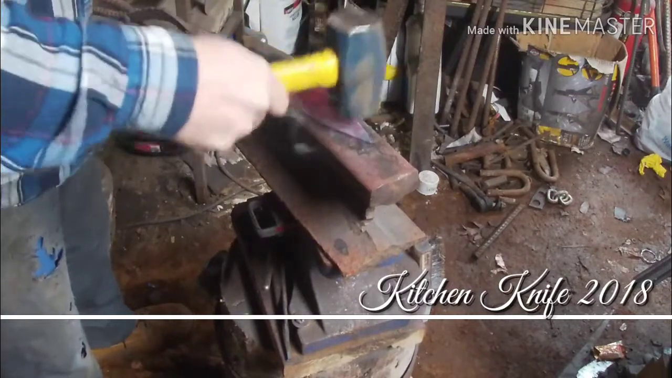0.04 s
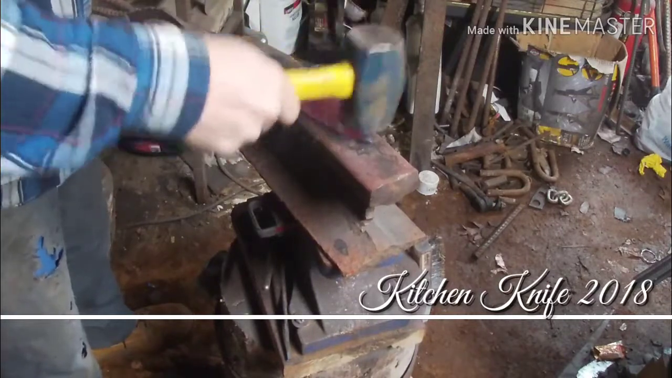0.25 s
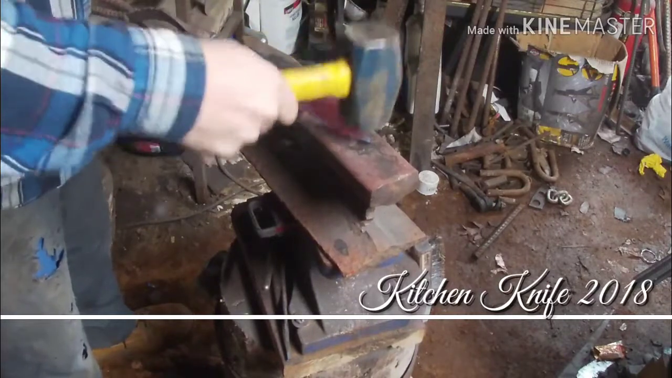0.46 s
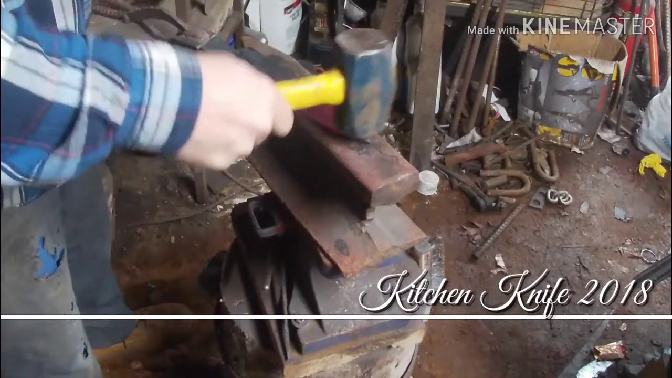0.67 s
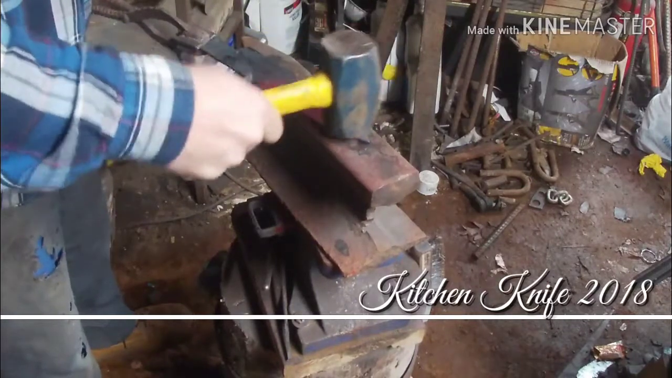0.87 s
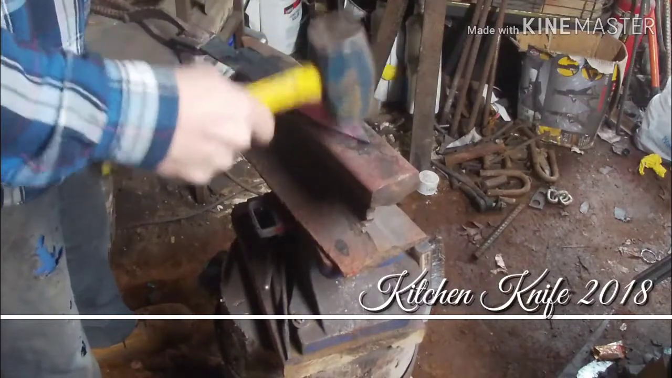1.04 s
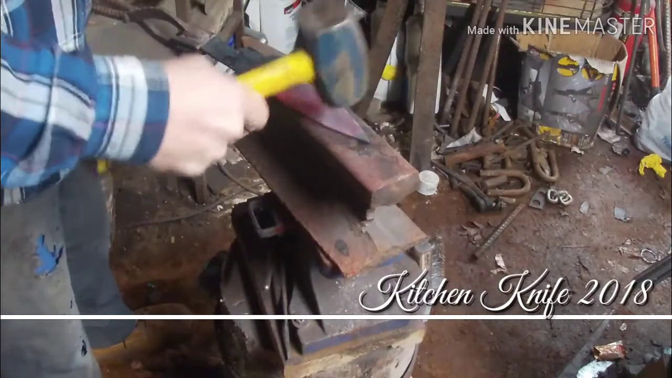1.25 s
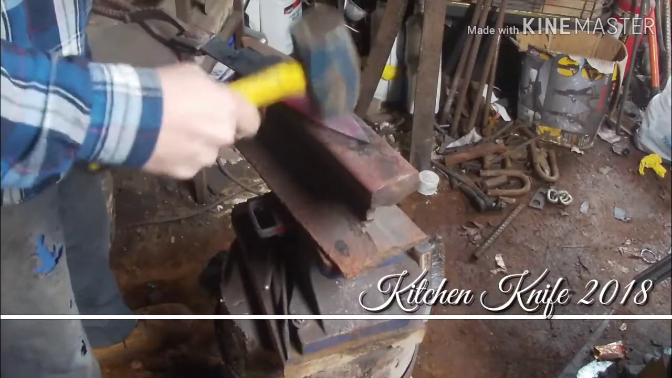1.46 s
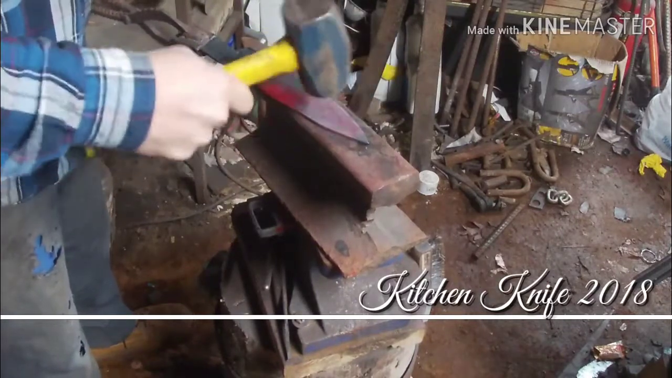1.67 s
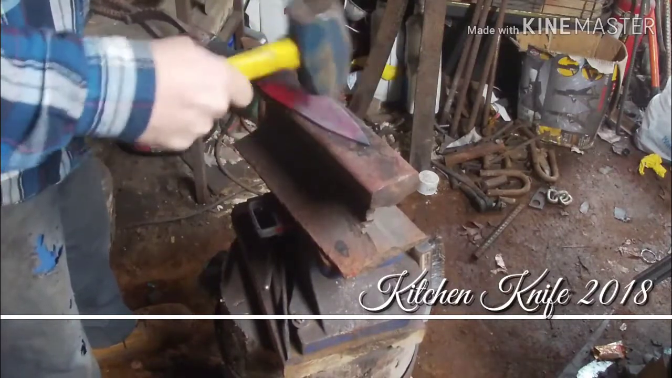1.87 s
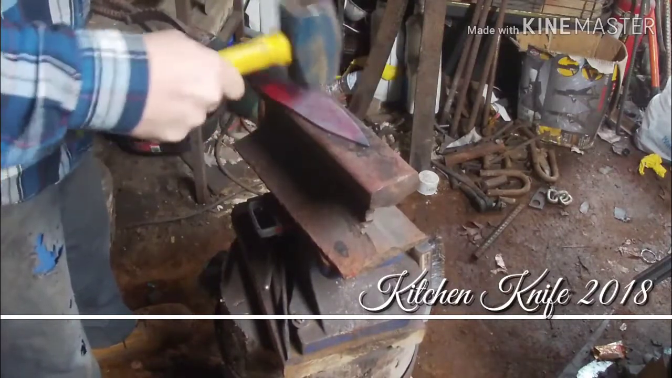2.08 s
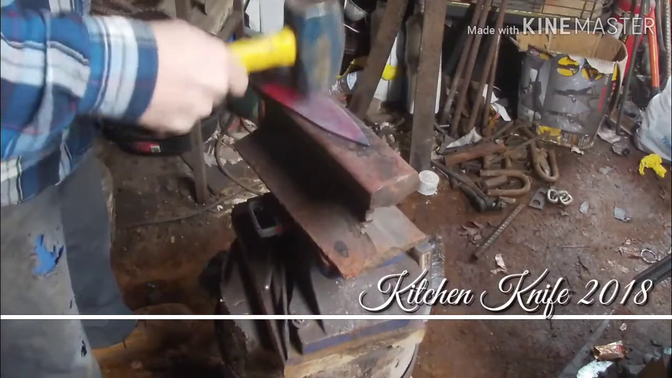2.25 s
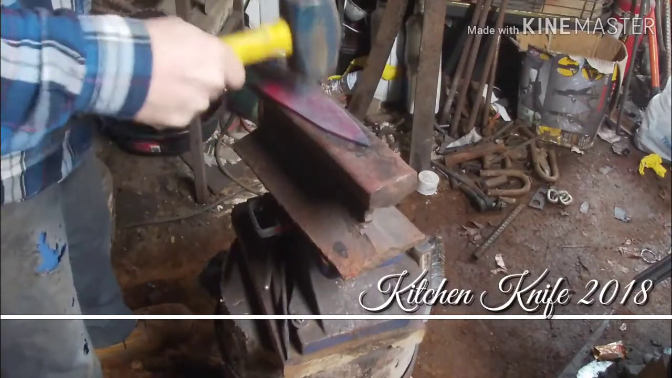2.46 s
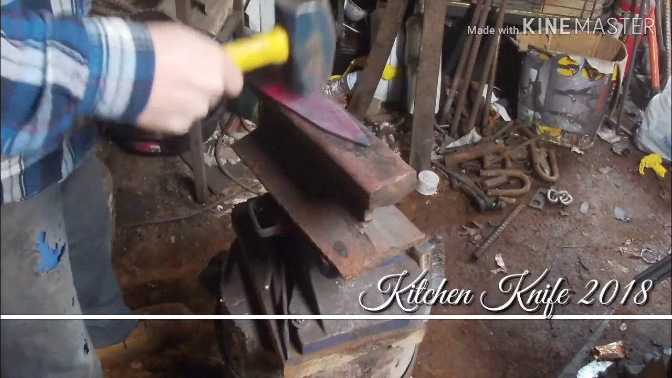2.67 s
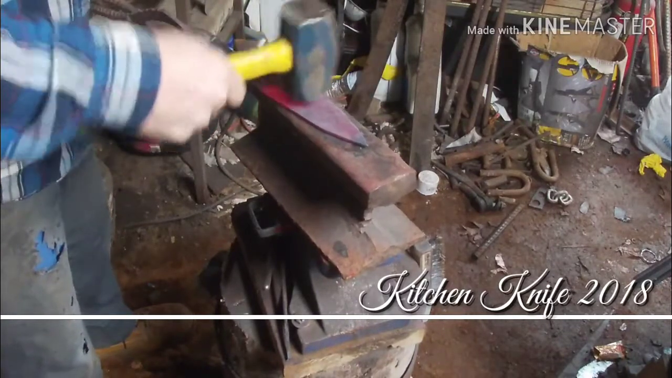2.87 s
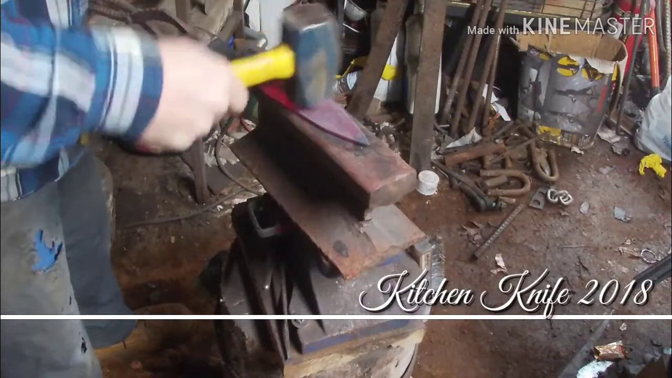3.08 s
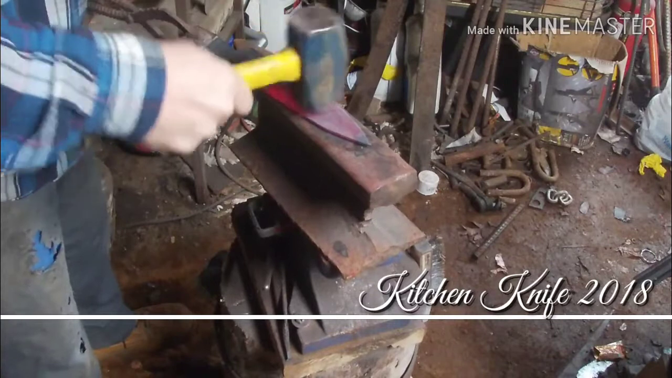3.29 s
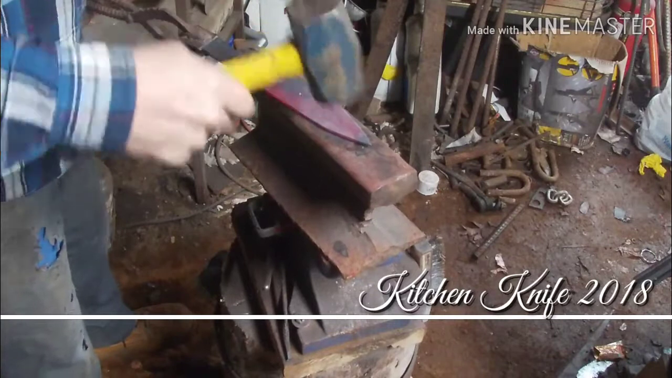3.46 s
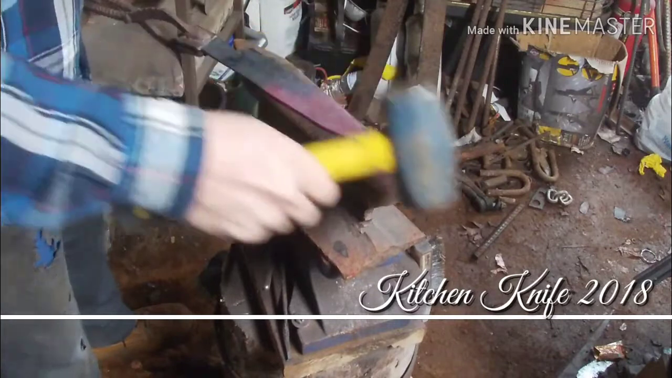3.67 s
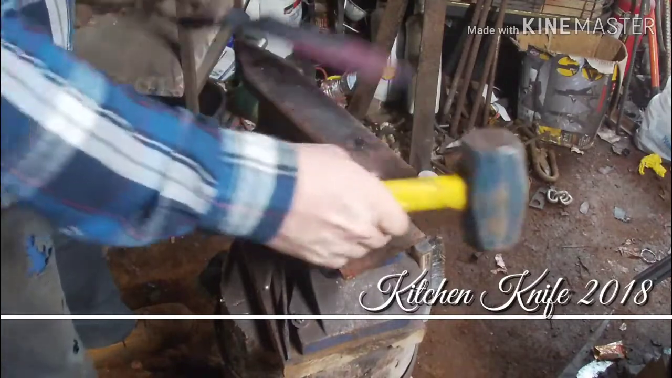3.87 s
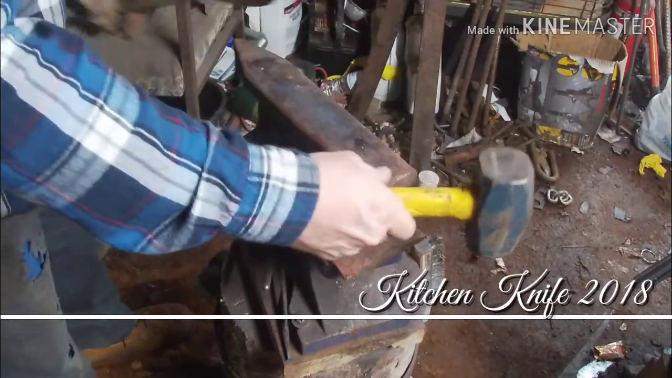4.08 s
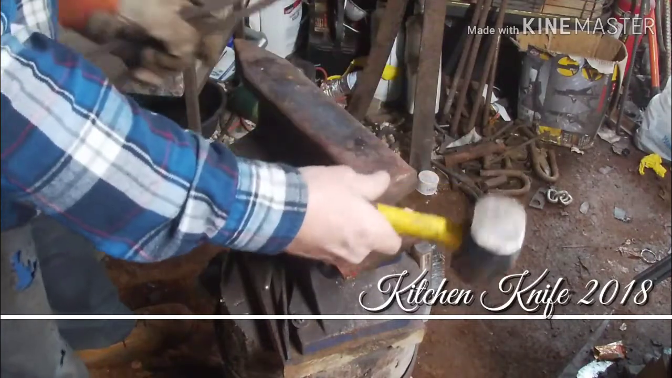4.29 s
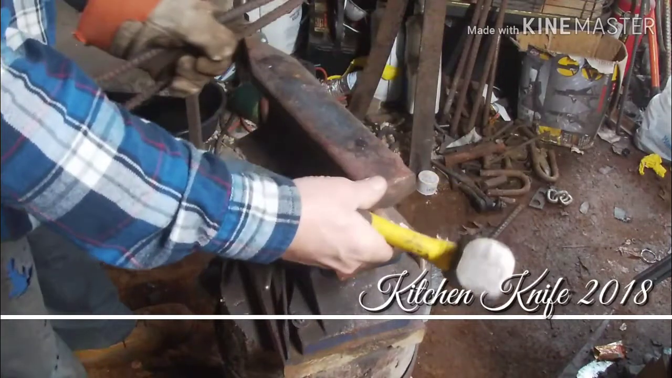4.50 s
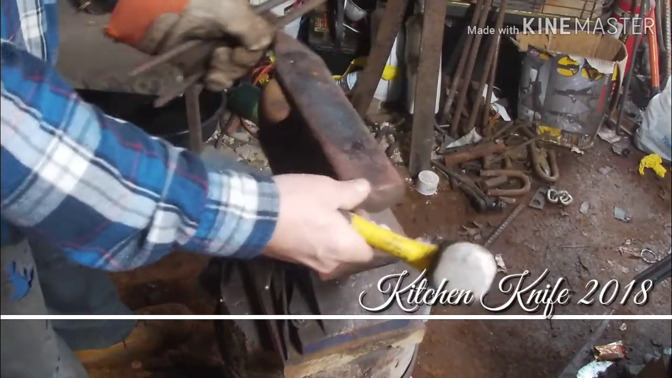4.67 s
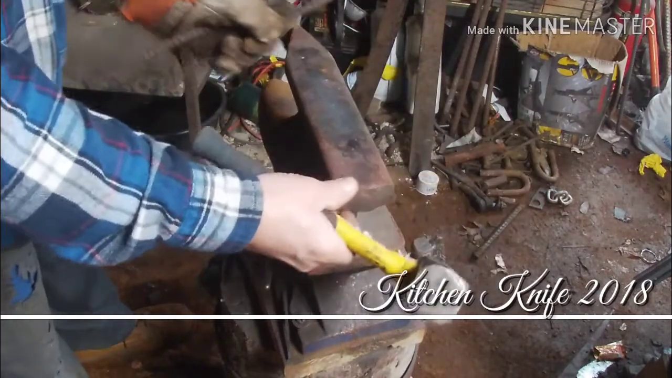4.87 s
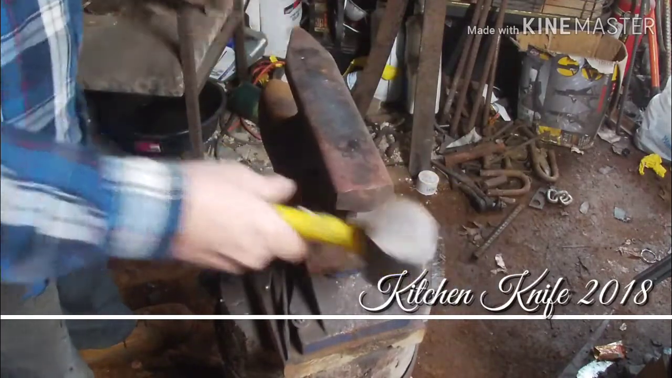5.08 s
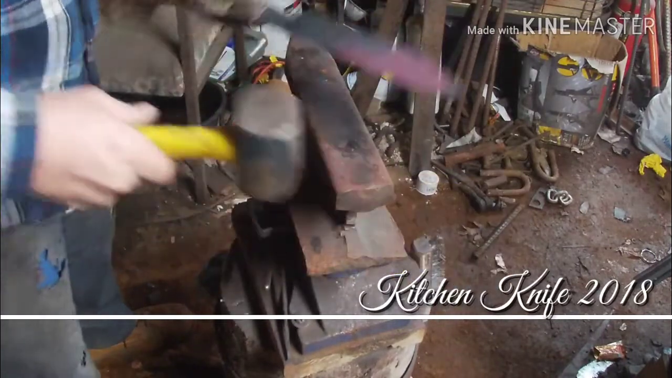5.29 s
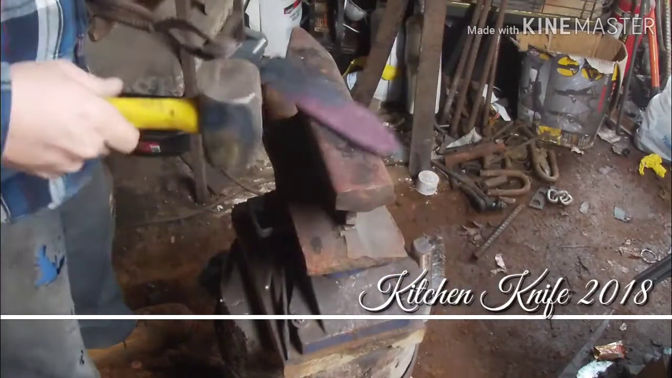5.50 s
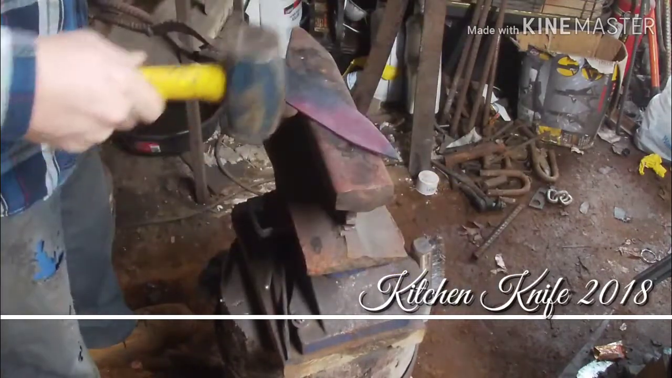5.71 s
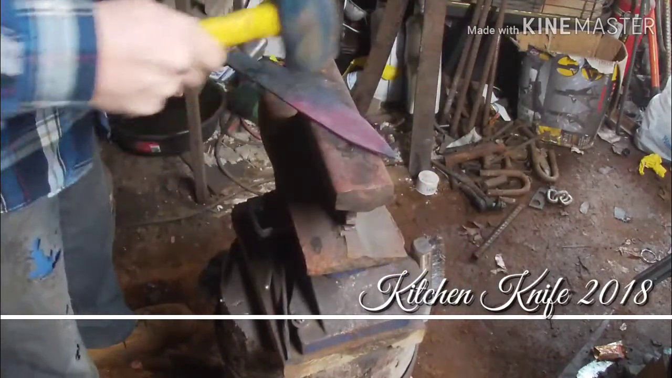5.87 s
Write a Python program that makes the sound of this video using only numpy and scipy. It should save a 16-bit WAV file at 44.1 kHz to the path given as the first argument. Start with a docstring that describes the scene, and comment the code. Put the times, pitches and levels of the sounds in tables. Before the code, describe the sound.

A hammer strikes hot steel about four or five times a second with dull clacks and short bright rings, then only rumbling forge draught remains.

```python
"""Hammer blows flatten a red-hot blade on a length of steel rail: each gives a crack, a dull clack and a ring.
The rings and clack are sums of decaying modes; the crack and the shed's echo are noise under decaying envelopes.
The blows are nearly evenly paced; in the pause after them the lifted blade shifts with faint scuffs of noise.
Behind it a forge rumbles (noise through narrow resonances) and hisses (noise that swells and flutters)."""
import sys
import numpy as np
from scipy import signal
from scipy.fft import rfft, irfft
from scipy.io import wavfile
from scipy.ndimage import uniform_filter1d

SR = 44100
rng = np.random.default_rng(int(sys.argv[2]) if len(sys.argv) > 2 else 0)


def master(y):
    """Save y as 16-bit WAV."""
    cut = np.clip(np.atleast_2d(y).T, -1, 1)
    pcm = np.round(cut * 32767)  # scale
    wavfile.write(sys.argv[1], SR, pcm.astype(np.int16))


N = 261954
TIME = np.arange(N) / SR

# Hammer blows; the spot struck decides how much each ring answers.
# Each row: start in seconds, knock level in dB, then low, main and high ring group levels in dB.
BLOWS = [(-0.15, -7.5, -29, -23, -32), (0.0683, -18, -33.5, -40.5, -48), (0.293, -15.5, -34, -27.5, -38),
         (0.518, -16, -30.5, -20.5, -32.5), (0.739, -16.5, -33.5, -19, -34), (0.9541, -17.5, -35, -17, -31),
         (1.174, -15.5, -32, -20.5, -29.5), (1.4027, -16.5, -32.5, -19, -27.5),
         (1.6135, -15.5, -30.5, -23.5, -36.5), (1.8422, -17.5, -20.5, -20, -29.5),
         (2.0534, -15.5, -22, -23, -32), (2.273, -22.5, -37, -41, -40), (2.493, -18, -22, -24, -26.5),
         (2.713, -19.5, -24, -31.5, -38), (2.929, -18, -20.5, -34.5, -35), (3.142, -19.5, -48, -32, -36.5),
         (3.3664, -21, -27.5, -32.5, -42)]
# Modes of the ringing steel, in groups that answer to where the blow lands.
# Each row: nominal frequency in Hz, level in dB relative to its group, free decay time t60 in seconds.
LOW_RING = [(2748, 2, 0.32), (2800, -10, 0.23)]
MAIN_RING = [(3596, 4, 0.55), (3650, -16, .3)]
HIGH_RING = [(4734, -1, .55), (4621, -8, .55)]
OVERTONES = [(3394, -2.5, .45), (4256, -5, .45), (5538, -8, .45), (5880, -12, .5), (6037, -10, .55),
             (6298, -8, .45), (6590, -15, .45), (6783, -11, .45), (6993, -13, .5), (7930, -22, .45),
             (8250, -21, .45), (9351, -19, .45), (9505, -23, .45), (9954, -25, .5), (11052, -36, .55),
             (12102, -30, .4), (13291, -36, .4)]
# A thin whistle that comes with the main ring and escapes the choke.
# Each row: frequency in Hz, level in dB relative to the main ring group, t60 in seconds.
WHISTLE = [(7682, -32, .85)]
# Hammer, blade and rail pressed together.
# Each row: mean frequency in Hz, relative level in dB ahead of the bass cut, t60 in seconds.
CLACK = [(790, -3, .028), (900, -6, .024), (1320, 0, .012), (1580, 2, .013), (1805, -3, .016),
         (2000, -5, .012), (2700, -3, .01)]
# The stump that carries the rail, and faint tones that linger in the rail.
# Each row: frequency in Hz, mean level in dB relative to the knock, t60 in seconds.
STUMP = [(149.4, 2.5, 0.085), (303, -9.5, 0.075)]
RAIL_HUM = [(1556, -17, .38), (1809, -22, .32)]
# Noise spectra of the crack, the shed's echo, the scuffs and the forge's draught.
# Each row: frequency in Hz, relative density in dB per Hz.
CRACK_SPECTRUM = [(500, -2.5), (900, 9.5), (2500, -4), (4200, 3.5), (5200, -2), (6300, -2), (7500, -2),
                  (9400, -5), (10600, -18), (12000, -15), (15000, -14)]
ECHO_SPECTRUM = [(400, -37), (820, 0), (1100, -6.5), (1560, 2), (1850, -2.5), (2250, -14.5), (2750, -2),
                 (3300, -10.5), (5200, -13.5), (6400, -3), (7600, -17), (9400, -19.5), (10600, -30),
                 (14800, -30.5)]
SCUFF_SPECTRUM = [(700, 3.5), (2000, -2), (4000, -12.5), (9000, -31), (13000, -63)]
DRAUGHT_SPECTRUM = [(300, -12.5), (450, 2.5), (560, -5), (700, -7), (850, 1), (980, -1), (1150, -7),
                    (1400, -15.5), (1900, -14), (3300, -18.5), (3900, -23.5), (5000, -27), (8500, -40.5),
                    (12000, -61)]
# The blade and tongs shift lightly in the pause. Each row: start in seconds, level in dB.
SHIFTS = [(4.053, -48), (4.765, -40.5), (5.564, -39.5), (5.632, -39.5), (5.715, -42)]
# Resonances of the forge's roar.
# Each row: frequency in Hz, approximate half-power width in Hz, relative power in dB.
ROAR = [(35, 12, -5.5), (64.9, 5.3, 1.5), (92.8, 11, 0), (133.5, 42, 1.5), (153.5, 15, -6),
        (205.3, 18.6, 1), (217, 41, -6), (248, 28, -4.5), (316, 38, -4), (347.4, 15, -16.5),
        (381.8, 18, -7.5), (385.3, 17.3, -6)]
# Swells of the draught. Each row: crest in seconds, half width (to 1/e of the rise) in seconds, rise in dB.
SWELLS = [(0.3, 1.96, 7.5), (4.25, 0.32, 3), (5.85, 0.38, 5)]

# a flat blow sets the whole rail ringing, a glancing one cracks instead:
# level on a typical blow in dB, then dB per dB of ring
TYPICAL_LOW_DB, TYPICAL_MAIN_DB = -30, -25
OVERTONE_DB, OVERTONES_PER_MAIN, OVERTONES_PER_LOW = -34.5, 0.43, 0.42
SNAP_DB, SNAP_PER_MAIN = -23, -0.22
# the tongs tighten over the first blows and ease off before the lift;
# full grip chokes the low and main rings and sharpens the low one
TIGHTEN_S, EASE_FROM_S, EASE_UNTIL_S = 0.46, 1.34, 2.97
CHOKE_DB_PER_S, SHARPEN_SHARE = 240, 0.0043
# the upper partials are choked alike under any grip; the overtones shift in pitch from blow to blow
UPPER_CHOKE_DB_PER_S, OVERTONE_DETUNE = 32.5, 0.0014
# the roar's level sinks a little during the hammering, then recovers
LOW_ROAR_DB, UPPER_ROAR_DB = -21.5, -22.0
SINK_FROM_S, SINK_S, RECOVER_FROM_S, RECOVER_S = 0.065, 1.05, 3.24, 0.37
LOW_SINK_DB, UPPER_SINK_DB = 3.5, 4
# the draught between swells: its rush and its bright hiss
RUSH_DB, HISS_DB = -43.5, -51
RUSH_FOLLOWS = 0.77  # share of the hiss's swell, in dB
CUTOFF_HZ = 15150


def hammering(crack_db=7.0, crack_t60=0.018, clack_db=-1.5,
              echo_db=-7.0, bright_echo_db=-8.0, echo_t60=0.26, bright_t60=0.33):
    """Impact excitation: contact noise, struck modes, and a wash of weak partials smeared by the shed."""
    steel, crack, echo, bright_echo = np.zeros((4, N))
    t = TIME[:SR * 3 // 5]
    build_up = 1 - np.exp(-t / 0.00054)
    for s, knock_db, low_db, main_db, high_db in BLOWS:
        snap_db = SNAP_DB + SNAP_PER_MAIN * (main_db - TYPICAL_MAIN_DB)
        grip = ramp(s, 0, TIGHTEN_S) - ramp(s, EASE_FROM_S, EASE_UNTIL_S - EASE_FROM_S)
        knock = from_db(clack_db) * clack(t) + support(t)
        crack_onset = 1 - np.exp(-t / 0.00014)
        add(steel, s, steel_ring(t, low_db, main_db, high_db, grip))
        add(steel, s, from_db(knock_db) * knock)
        add(crack, s, from_db(snap_db + crack_db) * fade(t, crack_t60) * crack_onset)
        add(echo, s, from_db(knock_db + echo_db) * fade(t, echo_t60) * build_up)
        add(bright_echo, s, from_db(snap_db + bright_echo_db) * fade(t, bright_t60) * build_up)
    dull = split(coloured_noise(ECHO_SPECTRUM, ripple_db=2), hz=3770)[0]
    bright = split(coloured_noise(ECHO_SPECTRUM, ripple_db=12), hz=4000)[1]
    crack_sound = crack * coloured_noise(CRACK_SPECTRUM, ripple_db=5)
    return steel + crack_sound + echo * dull + bright_echo * bright


def steel_ring(t, low_db, main_db, high_db, grip, free_s=0.11):
    """Contact damping: the steel rings freely while the hammer rebounds; the settling blade then chokes it."""
    overtone_db = (OVERTONE_DB + OVERTONES_PER_MAIN * (main_db - TYPICAL_MAIN_DB)
                   + OVERTONES_PER_LOW * (low_db - TYPICAL_LOW_DB))
    lower = from_db(low_db) * ring(LOW_RING, t, spread_db=0.5, scatter=0.55, sharpen=SHARPEN_SHARE * grip)
    lower += from_db(main_db) * ring(MAIN_RING, t, spread_db=0.3, scatter=0.15)
    upper = from_db(high_db) * ring(HIGH_RING, t, spread_db=0.8, scatter=0.5)
    upper += from_db(overtone_db) * ring(OVERTONES, t, spread_db=3, scatter=0.55, detune=OVERTONE_DETUNE)
    whistle = from_db(main_db) * ring(WHISTLE, t, spread_db=1, scatter=0.15)
    settled_s = np.maximum(t - free_s, 0)
    choked = lower * from_db(-CHOKE_DB_PER_S * grip * settled_s)
    choked += upper * from_db(-UPPER_CHOKE_DB_PER_S * settled_s)
    return (choked + whistle) * (1 - np.exp(-t / 0.0037))


def clack(t, detune=0.068, squash_s=0.00086):
    """Delayed modal impact: the soft hot steel gives way first, then the whole stack knocks at once."""
    late = np.maximum(t - squash_s, 0)
    out = np.zeros(len(t))
    for hz, db, t60 in CLACK:
        pitch = hz * (1 + detune * rng.standard_normal())  # shifts with every blow
        level = from_db(db + rng.normal(0, 1))
        out -= level * fade(late, t60) * np.sin(2 * np.pi * pitch * late)
    # so narrow a rail radiates little bass
    return signal.sosfilt(signal.butter(2, 680, "high", fs=SR, output="sos"), out)


def support(t):
    """Modes of the support: the stump thuds under the blow and the rail hums on faintly."""
    thud = ring(STUMP, t, spread_db=4, scatter=0.58)
    hum = ring(RAIL_HUM, t, spread_db=0.5, scatter=0.67)
    return (thud + hum) * (1 - np.exp(-t / 0.0034))


def handling(t60=0.16):
    """Friction noise: brief soft scuffs as the blade and tongs shift."""
    scuffs = np.zeros(N)
    t = TIME[:SR // 4]
    for s, db in SHIFTS:
        add(scuffs, s, from_db(db) * fade(t, t60) * (1 - np.exp(-t / 0.0015)))
    return scuffs * coloured_noise(SCUFF_SPECTRUM, ripple_db=9)


def forge(flutter_db=1.9):
    """Turbulence drives the narrow resonances of the fire pot and its duct; the draught hisses above them."""
    bins = np.fft.rfftfreq(N, 1 / SR)
    power = sum(from_db(db) ** 2 / width / (1 + 2 * ((bins - hz) / width) ** 2) ** 2
                for hz, width, db in ROAR)
    turbulence = irfft(rfft(rng.standard_normal(N)) * np.sqrt(power), N)
    low, upper = split(turbulence, hz=179.0)
    sunk = ramp(TIME, SINK_FROM_S, SINK_S) - ramp(TIME, RECOVER_FROM_S, RECOVER_S)
    roar = 0
    for band, level_db, sink_db in ((low, LOW_ROAR_DB, LOW_SINK_DB), (upper, UPPER_ROAR_DB, UPPER_SINK_DB)):
        # dividing by the running rms evens out the slow chance swells
        chance_swell = np.sqrt(uniform_filter1d(band ** 2, size=SR // 3))
        roar = roar + from_db(level_db - sink_db * sunk) * band / chance_swell
    rush, hiss = split(coloured_noise(DRAUGHT_SPECTRUM, ripple_db=5.0), hz=1100)
    swell_db = sum(db * np.exp(-((TIME - s) / width) ** 2) for s, width, db in SWELLS)
    flutter = flutter_db * waver(TIME, rate=24).real
    rush = from_db(RUSH_DB + RUSH_FOLLOWS * swell_db) * rush
    hiss = from_db(HISS_DB + swell_db + flutter) * hiss
    return roar + rush + hiss


def ring(modes, t, spread_db, scatter, detune=0, sharpen=0):
    """Modal superposition: struck modes decay, and arriving reflections make them waver in level and phase."""
    out = np.zeros(len(t))
    slow = t[::48]  # coarse time steps suffice for level and phase
    arrived = 1 - np.exp(-slow / 0.0055)
    for hz, db, t60 in modes:
        pitch = hz * (1 + sharpen + detune * rng.standard_normal())
        path = 1 + scatter * arrived * waver(slow, rate=76.5)
        strength = np.sqrt(2) * from_db(db + spread_db * rng.standard_normal())
        level = strength * fade(slow, t60) * abs(path)
        phase = np.unwrap(np.angle(path)) + 2 * np.pi * (pitch * slow + rng.random())
        out += np.interp(t, slow, level) * np.sin(np.interp(t, slow, phase).astype(np.float32))
    return out


def fade(t, t60):
    """Exponential free decay: 60 dB down after t60."""
    return from_db(-60 * t / t60)


def coloured_noise(spectrum, ripple_db):
    """Spectral shaping: steady noise with random ripples along its spectrum, scaled to rms 1."""
    hz, db = np.transpose(spectrum)
    bins = np.maximum(np.fft.rfftfreq(N, 1 / SR), 1)
    grid = np.linspace(0, SR / 2, 700)
    ripples = np.interp(bins, grid, rng.uniform(-1, 1, len(grid)))
    shape_db = np.interp(np.log(bins), np.log(hz), db)
    bass_cut = np.minimum(bins / hz[0], 1) ** 2
    gain = from_db(shape_db + ripple_db * ripples) * bass_cut
    return rms_one(irfft(rfft(rng.standard_normal(N)) * gain, N))


def waver(t, rate):
    """Random modulation: complex chance values, rate of them a second, joined by straight lines."""
    steps = rng.standard_normal((2, 256))
    return np.interp(t * rate, np.arange(256), steps[0] + 1j * steps[1]) / np.sqrt(2)


def split(x, hz):
    """Band division: the parts of a sound below and above hz, each with rms 1."""
    filters = [signal.butter(4, hz, side, fs=SR, output="sos") for side in ("low", "high")]
    return [rms_one(signal.sosfiltfilt(sos, x)) for sos in filters]


def ramp(t, start_s, length_s):
    """Linear transition: from 0 at the start to 1 after the given length."""
    return np.clip((t - start_s) / length_s, 0, 1)


def from_db(db):
    """Logarithmic level: decibels to amplitude gain."""
    return 10 ** (np.asarray(db) / 20)


def rms_one(x):
    """Normalisation by mean power: scale to unit rms."""
    return x / np.sqrt(np.mean(x ** 2) + 1e-20)


def add(track, s, sound):
    """Superposition: mix a sound into the track at time s, which may lie before the start."""
    at = round(s * SR)
    part = sound[max(-at, 0):N - at]
    track[max(at, 0):max(at, 0) + len(part)] += part


def scene():
    """Linear superposition of hammering, handling and forge in one channel."""
    return (hammering() + handling() + forge())[None]


def record(dry):
    """Soft saturation rounds off the highest peaks, then a steep low-pass cuts the top."""
    rounded = dry / (1 + (dry / 0.8) ** 6) ** (1 / 6)
    return signal.sosfilt(signal.ellip(10, 0.2, 80, CUTOFF_HZ, fs=SR, output="sos"), rounded)


dry = scene()
out = record(dry)
master(out)
```